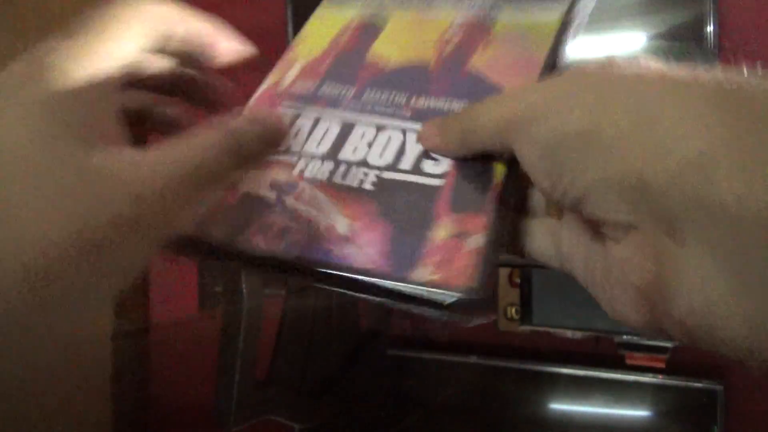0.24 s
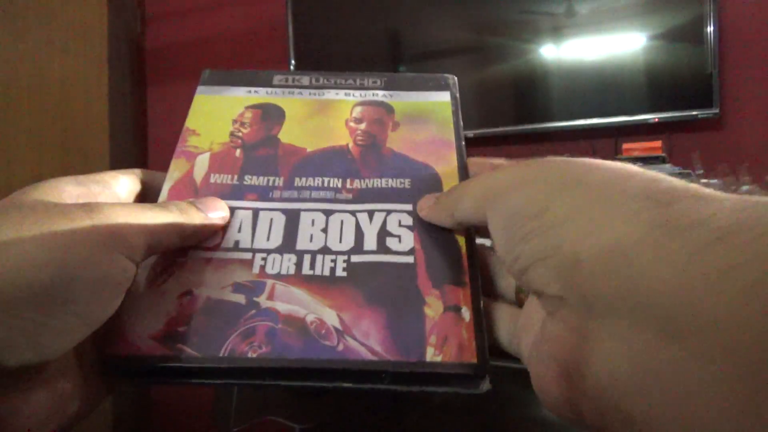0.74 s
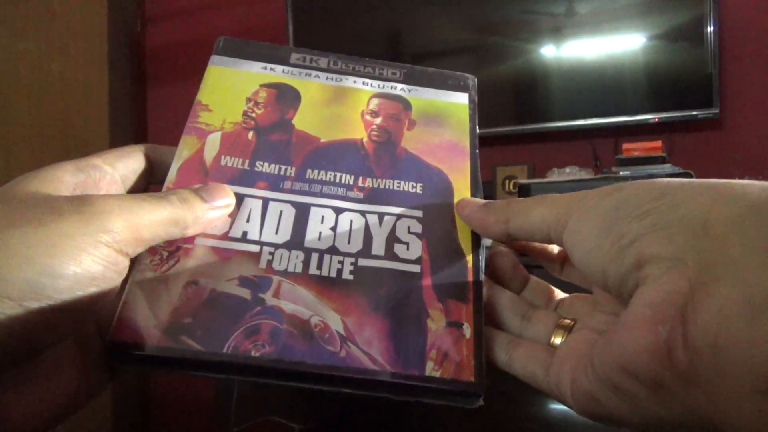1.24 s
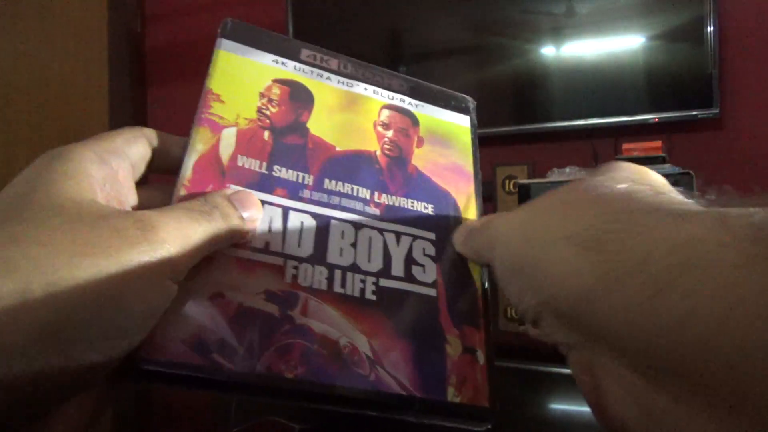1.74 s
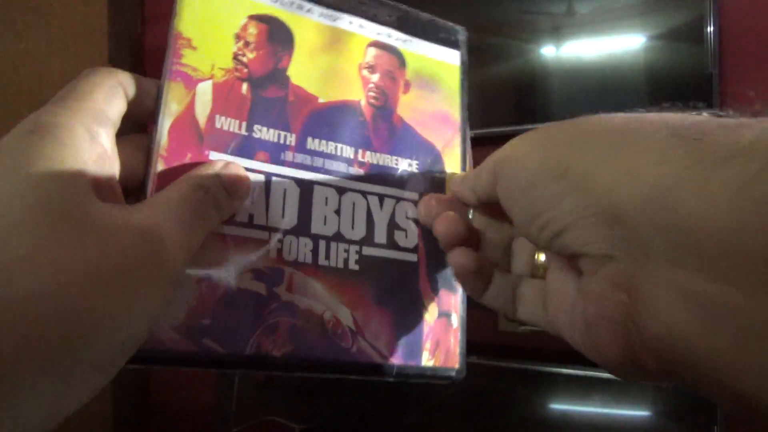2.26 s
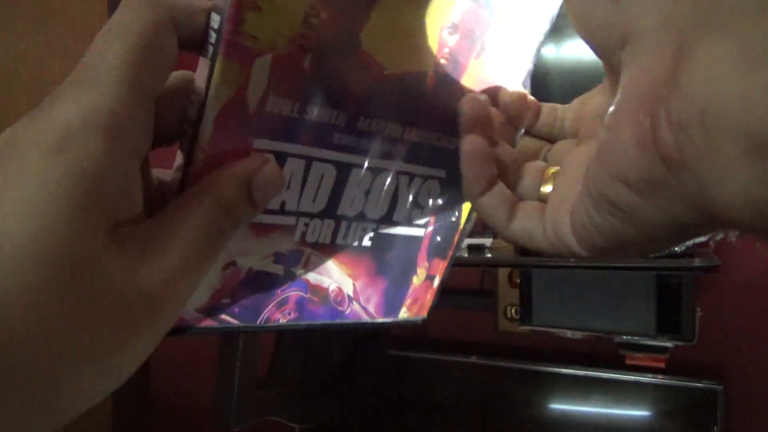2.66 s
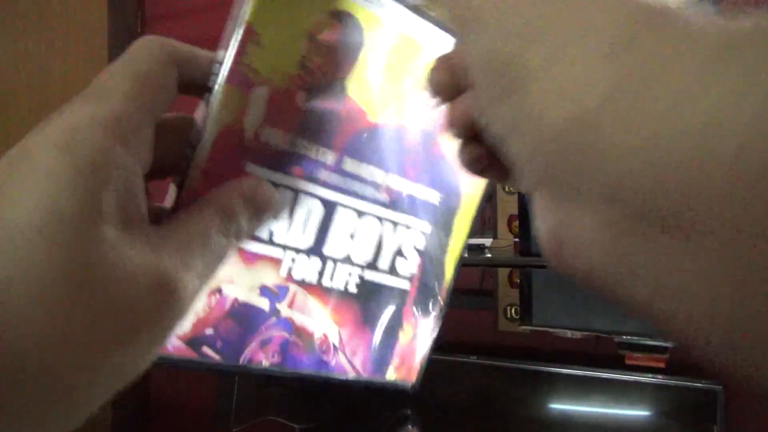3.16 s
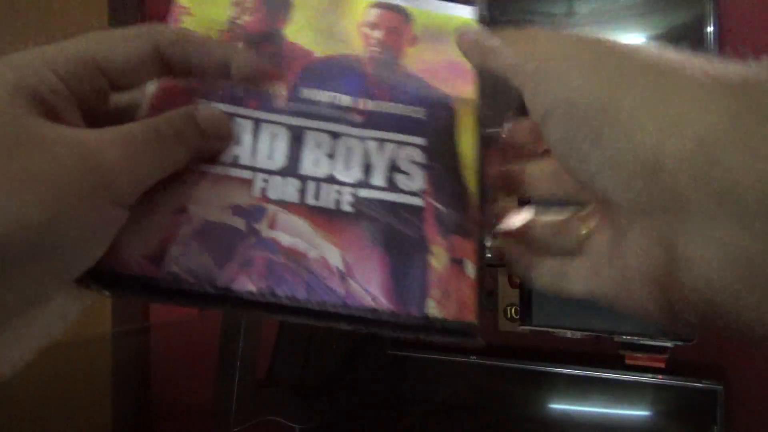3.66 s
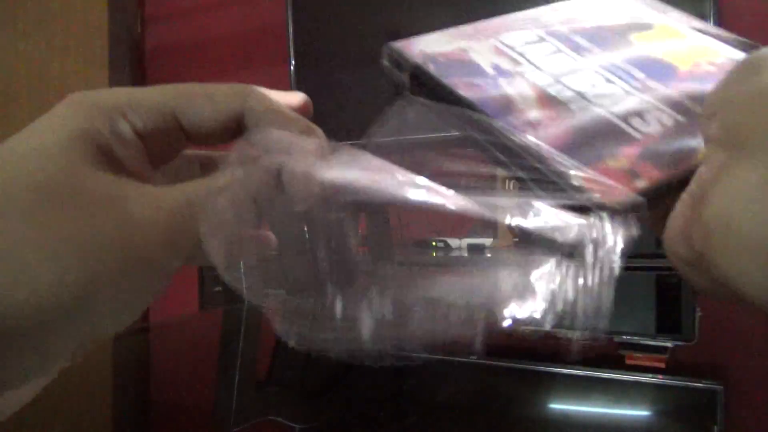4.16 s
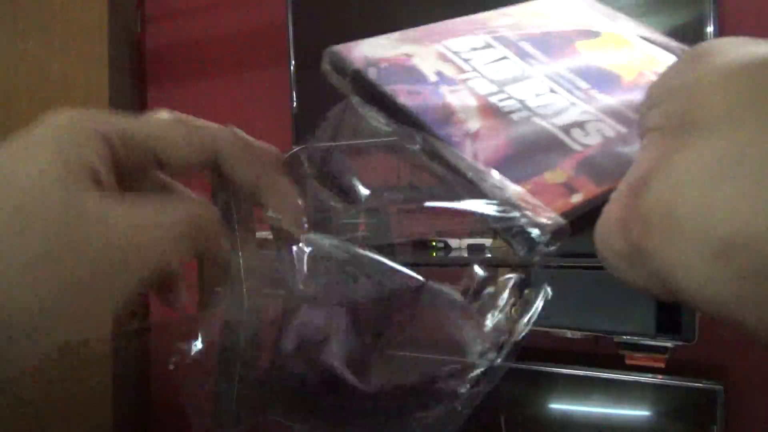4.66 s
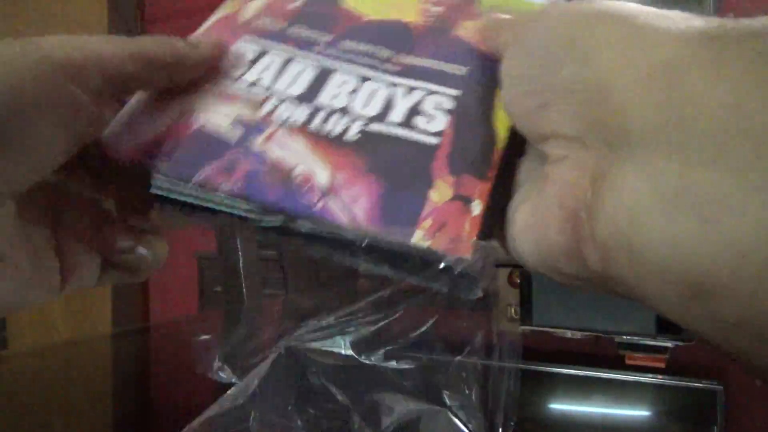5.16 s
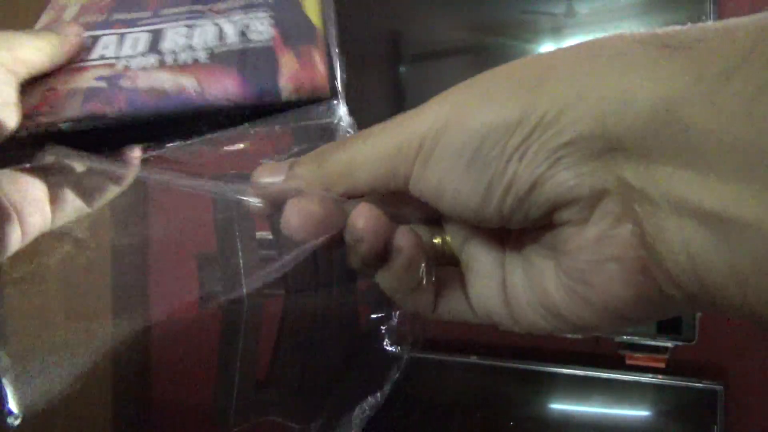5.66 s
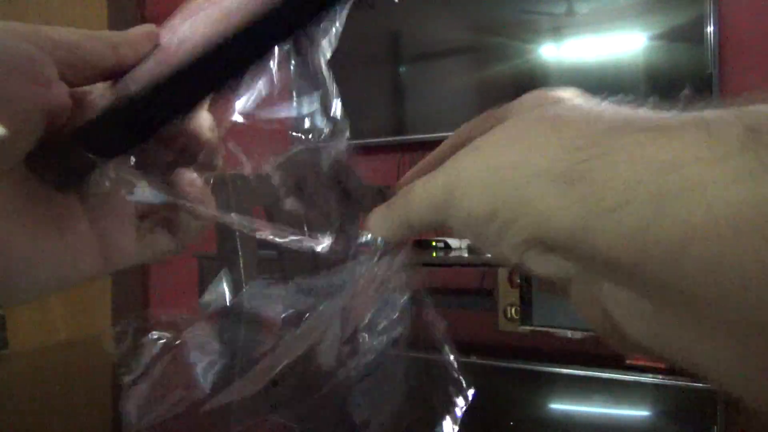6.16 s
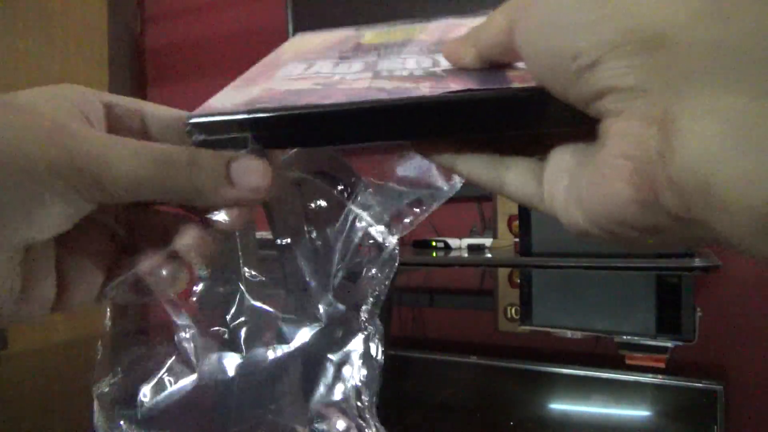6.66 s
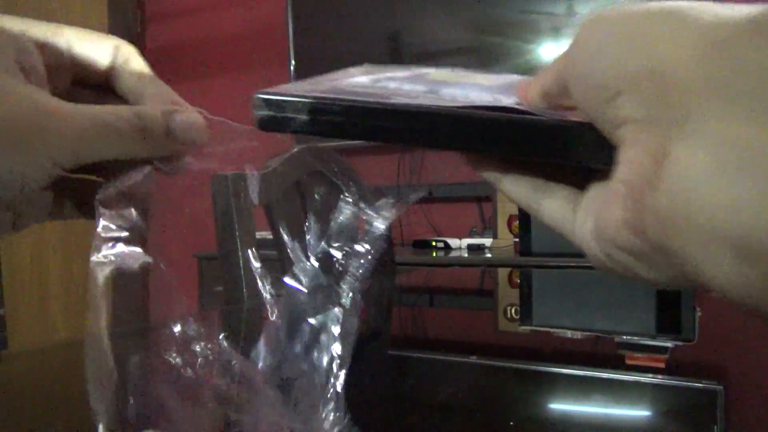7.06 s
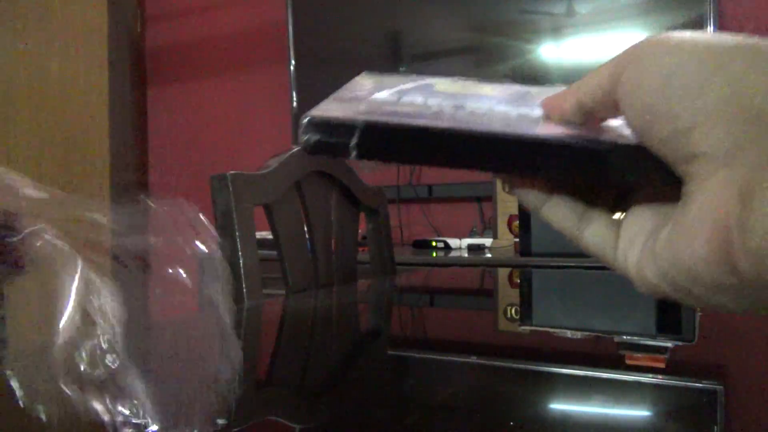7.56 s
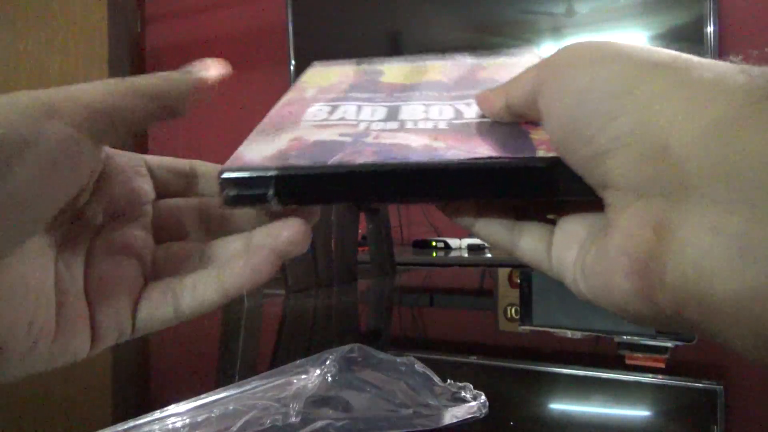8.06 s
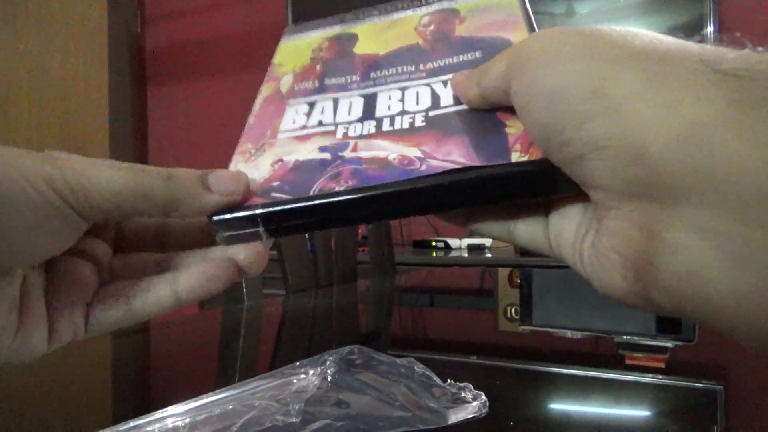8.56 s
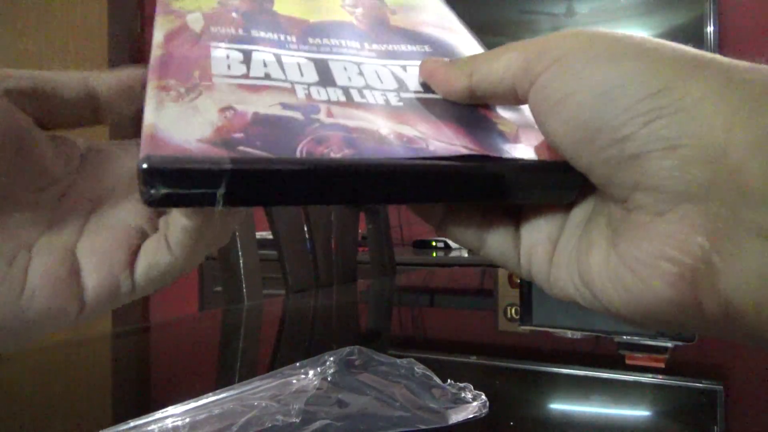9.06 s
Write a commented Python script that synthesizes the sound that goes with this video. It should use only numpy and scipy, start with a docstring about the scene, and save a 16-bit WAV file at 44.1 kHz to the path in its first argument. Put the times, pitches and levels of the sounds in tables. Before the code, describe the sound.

A close stereo microphone in a quiet room with soft noise and a faint high tick about 25 times a second. From 0 to 1 s, fingers rub and lightly knock a hollow plastic case, with small skin swishes. Sharp, bright film snaps begin about 1.1 s and grow more frequent to 2.6. At 2.7 s a rip starts, becoming thick crackle with hollow knocks, strongest from 2.9 to 3.5. A short lull, then loud snaps near 4.15 and 4.4, fading to quiet around 5. Crackling returns at 5.4, with a strong cluster at 5.6-5.8, a snap at 6.15 and softer crinkles afterwards. The loosened sheet rustles lower and broader, with a loud snapping burst at 7.05-7.4. After 7.8 s only sparse snaps and small case taps remain, notably at 8.2, 8.6 and 8.9; a last rustling stroke swells to the end at 9.3.

```python
"""Hands tear thin shrink film off a hollow plastic disc case, close to a small stereo microphone in a quiet room.
Soft noise and a faint regular tick lie underneath. First come rubs, light knocks and swishes of skin, then snaps.
From about 2.7 s the film crackles and snaps densely; after a lull near 5 s a second dense stretch follows.
Past 7.8 s the snaps thin out, and a last stroke swells into the end. Shaped noise makes rustle, snaps and skin;
blows and slips ring the modes of the case, and short sine blips make the tick."""
import sys
import numpy as np
from scipy import signal
from scipy.fft import rfft, irfft, next_fast_len
from scipy.io import wavfile
from scipy.ndimage import uniform_filter1d, map_coordinates

SR = 44100
rng = np.random.default_rng(int(sys.argv[2]) if len(sys.argv) > 2 else 0)


def inscribe(sig):
    """Save sig as 16-bit PCM at rate SR to the path in sys.argv[1].

    A 1-D sig is mono; a 2-D sig holds one channel per row.
    Samples are clipped to [-1, 1] before scaling.
    """
    pcm = np.round(np.clip(np.atleast_2d(sig).T, -1, 1) * 32767)
    wavfile.write(sys.argv[1], SR, pcm.astype(np.int16))


N = 411012
TIME_S = np.arange(N) / SR

# creases that snap; levels and lengths are nominal, trimmed in snaps():
# start_s, level_db, crease_hz, slap_db (relative to level_db), length_ms
SNAPS = [(0.303, -29, 6000, -33, 1.7), (0.316, -25.5, 5960, -21, 2.8), (0.417, -38, 7400, -22, 2.1),
         (1.12, -23, 9900, -25, 1.17), (1.1457, -21.5, 9700, -23, 2.6), (1.1561, -11.5, 9600, -23.5, 2.1),
         (1.362, -38, 7500, -20, 1.7), (1.467, -36, 9500, -16, 1.3), (1.5729, -17, 8800, -20.5, 5.9),
         (1.6018, -17, 9700, -31, 1.27), (1.611, -29, 9600, -17, 2.7), (1.713, -20, 6700, -16.5, 3.5),
         (1.7502, -22.5, 9150, -32, 2.1), (1.8124, -24.5, 9800, -31, 1), (1.8296, -24, 7700, -31, 2.1),
         (1.8405, -10, 9800, -20.5, 3.2), (1.889, -28, 10800, -33, 2.1), (1.9155, -17.5, 9800, -29, 4.2),
         (1.937, -28, 10500, -40, 0.71), (1.985, -34, 9900, -36, 2.5), (2.0774, -23.5, 9200, -12, 2.4),
         (2.0963, -18.5, 9500, -15.5, 2.8), (2.121, -16, 10070, -21.5, 0.71),
         (2.1254, -9.5, 8800, -32, 4.1), (2.2449, -21.5, 9200, -31, 3.5), (2.319, -21.5, 9100, -15, 1.8),
         (2.358, -13, 8500, -12.5, 0.8), (2.366, -27.5, 5300, -11, 2.4), (2.408, -19, 6200, -22, 2.2),
         (2.4453, -10.5, 6850, -33, 1.2), (2.4665, -12, 7640, -56, 3.8), (2.5468, -8, 8700, -20.5, 1.3),
         (2.7247, -8.5, 9100, -30, 1.11), (2.7677, -15, 8300, -18.5, 0.71), (2.776, -11, 9900, -47, 2.3),
         (2.7927, -19, 8750, -46, 0.73), (2.886, -21, 6860, -23, 1.3), (2.893, -18, 8160, -27, 2.8),
         (2.926, -16, 7850, -42, 0.63), (2.94, -14, 4950, -22, 10), (3.0875, -26, 7600, -16, 3.1),
         (3.1022, -32, 4800, -9, 3.5), (3.1261, -25.5, 7800, -8, 8.4), (3.143, -23, 9100, -13, 1.5),
         (3.158, -9.5, 7550, -25, 3.9), (3.184, -19, 5900, -10, 3.1), (3.198, -15.5, 8450, -14, 3.5),
         (3.2037, -30, 7400, -25, 3.6), (3.212, -15, 8750, -12, 1.4), (3.2293, -15, 8500, -14, 3.7),
         (3.246, -14, 6850, -15, 1.9), (3.276, -14.5, 7200, -12, 1.8), (3.283, -16.5, 8800, -8.5, 4.7),
         (3.3088, -15, 7100, -17, 11), (3.319, -20, 7500, -16, 1.3), (3.3304, -8, 6050, -14.5, 1.6),
         (3.3713, -13.5, 8300, -37, 2.4), (3.3774, -16, 9400, -12, 3.3), (3.3855, -18, 7900, -20, 2.7),
         (3.4214, -22, 9350, -30, 2.0), (3.4343, -22, 7000, -27, 4.3), (3.4494, -20.5, 9750, -9, 1.7),
         (3.482, -18, 8250, -28, 1.3), (3.7918, -25, 8300, -32, 1.4), (3.859, -23, 8800, -32, 4),
         (3.8984, -24, 8200, -21, 1.3), (3.959, -27, 7600, -13, 1.9), (3.973, -11.5, 8400, -26, 1.4),
         (4.082, -19, 7200, -29, 2.3), (4.0855, -21, 6800, -42, 4.4), (4.1541, -5.5, 7700, -26, 1.8),
         (4.1623, -8.5, 5600, -20, 2), (4.1715, -16, 6400, -24, 8.8), (4.178, -15, 6900, -34, 2.1),
         (4.3831, -19.5, 8400, -25, 1.9), (4.4241, -10, 4160, -21.5, 0.92), (4.553, -26, 7100, -16, 1.3),
         (4.5907, -34, 9000, -20, 1.5), (4.64, -27, 7900, -9, 0.9), (4.7111, -16.5, 9100, -16, 0.93),
         (4.73, -29, 5470, -20, 2.6), (4.8696, -32, 6700, -11.5, 1.7), (4.987, -34.5, 7900, -20, 1.8),
         (5.033, -31, 5300, -21, 1.2), (5.392, -33, 7240, -13, 9.3), (5.428, -21, 8900, -25, 1.6),
         (5.4317, -24.5, 8900, -11, 3), (5.4764, -25, 9400, -14, 1.4), (5.512, -25, 9900, -21, 4),
         (5.5286, -22, 7660, -17, 1.2), (5.596, -25.5, 8200, -16, 29), (5.63, -15, 5470, -25, 0.96),
         (5.6558, -12, 6800, -22, 6.3), (5.6732, -16.5, 5300, -13, 1.1), (5.6893, -7, 7000, -15.5, 0.86),
         (5.716, -12.5, 8600, -25, 6.1), (5.7255, -6, 8600, -19, 1.7), (5.7349, -7.5, 7200, -25, 0.96),
         (5.7669, -12, 6700, -38, 7.3), (5.8991, -25, 7700, -15, 3.7), (5.9317, -22.5, 9570, -23, 2),
         (5.9437, -30, 7150, -25, 2.9), (6.0047, -27.5, 6660, -16, 1.6), (6.049, -23.5, 8400, -11.5, 2.4),
         (6.0714, -23, 7900, -20, 3.3), (6.08, -28, 9200, -8, 2.1), (6.1262, -23, 9400, -14, 1.3),
         (6.1563, -8, 9500, -17, 4.6), (6.2627, -28.5, 8440, -23, 11), (6.326, -29, 9300, -26, 0.67),
         (6.5329, -24, 6360, -25, 6.6), (6.629, -21, 7600, -20, 9.2), (6.6417, -24, 9300, -25, 3.4),
         (6.6755, -22.5, 7200, -11, 8.1), (6.7284, -22, 6800, -29, 13), (6.745, -26, 7700, -30, 2.2),
         (6.7503, -21.5, 6860, -40, 1.06), (6.7628, -25, 6500, -34, 1.9), (6.8259, -14, 5170, -21, 1.9),
         (6.886, -25, 6700, -20, 3), (7.0202, -28.5, 4970, -23, 1.5), (7.0453, -18.5, 6170, -18, 1.3),
         (7.0525, -14, 6100, -52, 1.3), (7.0565, -8, 6400, -20.5, 3.6), (7.0813, -5, 5300, -25, 1.6),
         (7.121, -26, 6000, -17, 3), (7.136, -20, 5000, -15.5, 1.1), (7.2035, -25, 6300, -33, 1.8),
         (7.238, -33, 6140, -16, 1.8), (7.256, -30, 5800, 1, 0.57), (7.263, -7, 5540, -10, 1.9),
         (7.275, -6, 6470, -21, 0.85), (7.281, -18, 6100, -21, 3.2), (7.2907, -17, 6700, -12, 2.4),
         (7.298, -6, 5350, -24, 2.4), (7.3138, -9.5, 7400, -11, 5.1), (7.3233, -7, 6950, -18.5, 1.3),
         (7.3333, -20, 8600, -5, 5.4), (7.359, -11, 7200, -19, 5), (7.45, -20.5, 6960, -28, 7.9),
         (7.631, -26, 4900, -18, 5), (7.678, -33, 6000, -2.5, 2), (7.7093, -23.5, 8450, -36, 2.1),
         (7.753, -24, 9300, -23, 1.1), (7.7601, -22, 9300, -14, 1.6), (7.8093, -25, 4900, -22, 3.3),
         (7.867, -33, 9500, -30, 2.2), (8.18, -33, 6100, -15, 4.5), (8.229, -35.5, 8900, -33, 2.4),
         (8.4108, -36.5, 8900, -13.5, 2.1), (8.6036, -16, 8600, -27, 0.97), (8.6746, -33, 8750, -23, 3.5),
         (8.965, -27, 8500, -25, 2), (8.9743, -17.5, 7400, -24, 2.1), (9.278, -26, 5500, -26, 5)]
# finger knocks on the case, levels before the trim in case(): start_s, level_db
KNOCKS = [(0.135, -41), (0.2, -56), (0.245, -46), (0.316, -33), (0.45, -47), (0.505, -48), (0.52, -43.5),
          (0.615, -53), (0.743, -48.5), (1.574, -38.5), (1.84, -33), (1.915, -43), (2.096, -42),
          (2.366, -30), (2.445, -41), (2.462, -39), (2.708, -40), (2.784, -32.5), (2.885, -32),
          (2.928, -34), (2.942, -39), (2.953, -21.5), (3.127, -29.5), (3.181, -26), (3.194, -25.5),
          (3.212, -30), (3.275, -26), (3.283, -26.5), (3.312, -18), (3.332, -37), (3.376, -27),
          (3.434, -42), (3.457, -30.5), (3.536, -34.5), (3.788, -33), (4.153, -31), (4.423, -36),
          (4.523, -38.5), (4.715, -55), (5.306, -42), (5.359, -44), (5.375, -46), (5.527, -42.5),
          (5.632, -33), (5.686, -34), (5.712, -21), (5.725, -32), (6.157, -29.5), (6.352, -45),
          (6.402, -47), (6.501, -31.5), (6.884, -42), (7.053, -33), (7.085, -32.5), (7.264, -31),
          (7.792, -57), (8.194, -36), (8.33, -52), (8.83, -41.5), (8.855, -40), (8.886, -40), (8.972, -41),
          (9.05, -42.5)]
# modes of the hollow case: pitch_hz, width_hz, level_db
CASE_MODES = [(284, 250, -10.5), (548.5, 142, 0), (737.5, 125, 2.5), (1097, 330, -1.5), (1505, 1570, -10)]
SWING_DB = 20  # what a swell gains over its rise time and loses over its fall time


def amp(db):
    """Turn dB into gain."""
    return 10 ** (np.asarray(db) / 20)


def unit(x):
    """Scale to rms 1."""
    return x / np.sqrt(np.mean(x ** 2) + 1e-20)


def along(points, hz):
    """Read a curve of (Hz, value) points on a log frequency axis."""
    f, v = np.transpose(points)
    return np.interp(np.log(hz + 1), np.log(f + 1), v)


def over_time(points):
    """Draw straight lines through (s, value) points, one value a sample."""
    return np.interp(TIME_S, *np.transpose(points))


def wobble(rate):
    """A smooth random curve with rate knots a second."""
    knots = rng.standard_normal(int(N * rate / SR) + 4)
    return map_coordinates(knots, [np.arange(N) * rate / SR])


def filtered(x, response):
    """Multiply the spectrum of x by a complex response of frequency."""
    m = next_fast_len(x.shape[-1] + 8192)
    spectrum = rfft(x, m) * response(np.fft.rfftfreq(m, 1 / SR))
    return irfft(spectrum, m)[..., :x.shape[-1]]


def coloured(x, spectrum):
    """Give x a spectral tilt in dB, then scale it to rms 1."""
    return unit(filtered(x, lambda f: amp(along(spectrum, f))))


def resonance(f, hz, width_hz):
    """One causal resonance with gain 1 at its centre."""
    return 1j * f * width_hz / (hz * hz - f * f + 1j * f * width_hz)


def crackle(rate, spread_db, life):
    """Random short noise bursts of unequal size, rms 1; rate is per second, life in seconds."""
    happens = rng.random(N) < rate / SR
    sizes = happens * amp(spread_db * np.minimum(rng.exponential(size=N), 3))
    u = np.arange(SR // 20) / SR / life
    envelope = signal.fftconvolve(sizes, u * np.exp(-u))[:N]
    return unit(envelope * rng.standard_normal(N))


def place(times, rows):
    """Add each row of samples at its time."""
    at = np.round(times * SR).astype(int)[:, None] + np.arange(rows.shape[1])
    return np.bincount(at.ravel(), rows.ravel(), N + SR)[:N]


def peak_one(rows):
    """Scale each row to a peak of 1."""
    return rows / np.abs(rows).max(axis=1, keepdims=True)


def air():
    """Soft room noise whose level drifts, alike in the bass and wide in the middle."""
    # noise spectrum: pitch_hz, level_db (per Hz)
    air_spectrum = [(24, -58), (40, -9), (211, 4), (593, 4.5), (1990, -2), (9720, -15.5), (15300, -33),
                    (16500, -26)]
    # left-right likeness: pitch_hz, likeness (1 is identical)
    air_likeness = [(60, 0.83), (240, 1), (950, 0.15), (3770, 0.21), (15000, 0.82)]

    def split(f):
        """Share the noise between middle and sides by its likeness."""
        turn = np.arccos(np.clip(along(air_likeness, f), -1, 1)) / 2
        return amp(along(air_spectrum, f)) * [np.cos(turn), np.sin(turn)]

    mid, side = filtered(rng.standard_normal((2, N)), split)
    level_db = -59.5 + 0.45 * wobble(2.24)
    return amp(level_db) * unit(np.array([mid + side, mid - side]))


def swells(s, rise, fall, *levels_db):
    """Swells that climb to a peak at s and fade; their powers add. One power curve for each set of levels."""
    t = np.arange(0, N / SR + .002, .002)
    late = t - s[:, None]
    rising, falling = -late / np.reshape(rise, (-1, 1)), late / np.reshape(fall, (-1, 1))
    under_db = SWING_DB * np.maximum(rising, falling)
    curves = [(amp(db[:, None] - under_db) ** 2).sum(0) for db in levels_db]
    return [np.interp(TIME_S, t, curve) for curve in curves]


def handling():
    """Levels of fine, coarse and broad rustle and creak: strokes drive most, snaps shake film, knocks the case."""
    # pulls and rubs of the fingers, before the trims of each layer: peak_s, rise_s, fall_s, coarse_db,
    # fine_db (relative to coarse_db), creak_db (relative to coarse_db)
    strokes = [(.2, 0.28, 0.18, -48, -6, -5.5), (.29, 0.32, 0.049, -46, -22, -1),
               (.5, 0.47, 0.32, -56, -21, 3.5), (.56, 0.088, .1, -54.5, 2, -8),
               (.66, 0.19, 0.12, -62, 13, -13), (.73, .2, 0.039, -63.5, 12.5, -10),
               (.93, 0.36, 0.22, -67, 12, -20), (1.77, 0.15, 0.094, -65, 8, 14.5),
               (2.253, 0.038, 0.052, -46.5, 20, -20), (2.34, 0.26, 0.15, -47, -9, -5),
               (2.49, 0.6, 0.23, -45.5, 5, -4.5), (2.6, 0.066, 0.34, -41, -2, -14),
               (2.764, 0.04, 0.24, -27, 1, -18.5), (2.885, 0.013, 0.011, -24, 3.5, -9),
               (2.949, 0.035, 0.018, -29, 3.5, -16), (3.05, 0.053, 0.4, -47, -1.5, 0.5),
               (3.251, 0.063, 0.052, -31.5, 3, 2.5), (3.43, 0.4, 0.4, -46.5, 0, 1),
               (3.62, 0.55, 0.82, -53.5, -10, -15), (3.812, 0.091, 0.11, -44, 1, 1.5),
               (3.965, 0.076, 0.11, -39.5, -5, -4), (4.166, 0.1, 0.035, -29, -6, -4),
               (4.33, 0.36, 0.31, -53.5, -18, 1), (4.434, 0.27, 0.094, -41.5, -2.5, -8),
               (4.7, 0.094, 0.092, -39, 4, -5), (5.22, 0.022, 0.08, -52.5, -4, 3),
               (5.353, 0.19, 0.076, -51.5, -0.5, -2.5), (5.46, 0.03, 0.31, -46.5, 4, -1.5),
               (5.609, 0.063, 0.045, -34, 1.5, -18), (5.725, 0.2, 0.063, -35, -3, -12),
               (6.11, 0.56, 0.72, -45, -5, -10.5), (6.521, 0.16, 0.27, -46.5, -9, -1),
               (6.685, 0.13, 0.11, -42.5, 5, -7.5), (7.327, 0.047, 0.076, -23.5, -25, -11),
               (7.637, 0.1, 0.11, -46.5, -3, -11), (7.76, 0.03, 0.37, -48, 7, -14),
               (7.801, 0.077, 0.048, -36, 0, -11), (8.171, 0.053, 0.05, -52, 5.5, -15),
               (8.27, 0.19, 0.54, -59, -0.5, -6), (8.77, 0.087, 0.41, -47.5, 1.5, -7),
               (8.852, 0.086, 0.083, -47, -4, -1), (8.984, 0.14, 0.97, -54, 1, 0),
               (9.32, 0.15, .1, -37, -0.5, -20)]
    # the film hangs looser as it comes off: time_s, broad_db (relative to the stroke's coarse rustle)
    slackness = [(0, -23), (3, -12), (4.6, -9), (7.7, -3), (9.32, -8)]
    shiver_db, shiver_rise_s, shiver_fall_s = -38, 0.013, 0.097  # rustle round each snap
    flap_db, flap_fall_s = -15, 0.18  # the slack sheet rustles round each slap
    settle_db, settle_rise_s, settle_fall_s = -10.5, 0.014, 0.083  # creak round each knock
    hold_db = -69  # the case creaks faintly all along, as it is held
    bright_db_per_octave, even_hz = 16, 7400  # high creases shake out finer rustle; equal at even_hz

    s, rise, fall, db, fine_db, creak_db = np.transpose(strokes)
    fine, coarse, creak = swells(s, rise, fall, db + fine_db, db, db + creak_db)
    slack = coarse * amp(over_time(slackness)) ** 2

    s, db, hz, slap_db, _ = np.transpose(SNAPS)
    tilt_db = bright_db_per_octave * np.log2(hz / even_hz) / 2
    flap, = swells(s, shiver_rise_s, flap_fall_s, db + slap_db + flap_db)
    shake_db = db + shiver_db
    fine_shiver, coarse_shiver = swells(s, shiver_rise_s, shiver_fall_s, shake_db + tilt_db, shake_db - tilt_db)

    s, db = np.transpose(KNOCKS)
    settle, = swells(s, settle_rise_s, settle_fall_s, db + settle_db)
    powers = fine + fine_shiver, coarse + coarse_shiver, flap + slack, creak + settle + amp(hold_db) ** 2
    return [10 * np.log10(p + 1e-12) for p in powers]


def patchy(depth_db):
    """Two hisses whose colour drifts in patches as the fingers slide."""
    z = signal.stft(rng.standard_normal((2, N)), nperseg=256)[2]
    field = rng.standard_normal(z.shape)
    field = uniform_filter1d(field, 8, 1)  # smooth over frequency
    field = uniform_filter1d(field, 24, 2)  # smooth over time
    return signal.istft(z * amp(depth_db * unit(field)), nperseg=256)[1][:, :N]


def rustle(fine_db, coarse_db, broad_db):
    """Countless small creases over a sliding hiss: fine ones sound high, wide ones lower; all come in clumps."""
    # spectra of fine creases, wide creases and slack sheet: pitch_hz, level_db (per Hz)
    fine_spectrum = [(600, -57), (4500, -17.5), (8000, -4), (9700, -4), (11000, -11), (12000, -13.5),
                     (15500, -22)]
    coarse_spectrum = [(300, -60), (1500, -28), (2700, -21), (3300, -5), (5500, 0), (7500, -3), (9500, -14),
                       (15000, -24)]
    broad_spectrum = [(250, -35), (900, 0), (1500, -8), (2500, -0.5), (3500, -7.5)]
    # sizes of wide creases, heard as pitches: pitch_hz
    crease_bands_hz = [3400, 4700, 6600]
    # crackliness, low while fingers rub or the film rips evenly: time_s, crackle_db (over the hiss)
    graininess = [(0, 4), (1, -10), (1.2, 10), (2.7, -5), (2.76, 0), (2.871, 4.5), (2.97, 22), (3.75, -1),
                  (4.2, 5), (4.4, 19), (4.68, 6), (4.85, 19), (7.3, 6), (7.42, 2), (7.6, 4.5), (7.8, 5),
                  (7.9, 6), (9.32, 9)]

    clump_db = 1.6 * wobble(60)
    grain = amp(over_time(graininess))
    hiss = patchy(depth_db=2.5)
    fine_crackle = crackle(500, spread_db=4, life=0.00017)
    fine = coloured(hiss[0], fine_spectrum) + grain * coloured(fine_crackle, fine_spectrum)

    wide_crackle = 0
    for hz in crease_bands_hz:
        pops = crackle(250, spread_db=5.5, life=0.0007)
        wide_crackle = wide_crackle + unit(filtered(pops, lambda f: resonance(f, hz, .5 * hz)))
    coarse = coloured(hiss[1], coarse_spectrum) + grain * coloured(wide_crackle, coarse_spectrum)

    sheet = rng.standard_normal(N) + crackle(300, spread_db=4.5, life=0.0017)
    broad = coloured(sheet, broad_spectrum)
    film = amp(fine_db - 5.0) * fine + amp(coarse_db - 3.5) * coarse
    film = film / np.sqrt(1 + grain ** 2)  # more crackle means less hiss
    return amp(clump_db) * (film + amp(broad_db) * broad)


def tick():
    """A faint high tick, 25 times a second, from somewhere in the room: short decaying sine blips."""
    s = np.arange(.03, N / SR - .02, 1 / 25)
    t = np.arange(512) / SR
    blip = np.sin(2 * np.pi * 3490 * t) * t / 0.0051 * np.exp(1 - t / 0.0026)
    scatter_db = rng.normal(0, 2.5, (len(s), 1))
    return place(s, amp(-55.5 + scatter_db) * blip)


def body(f, spot_db):
    """The modes of the hollow case, each raised or lowered by the spot that is touched."""
    thin_hz = 248  # the small case radiates little below this
    modes = 0
    for k, (hz, width_hz, db) in enumerate(CASE_MODES):
        sign = (-1) ** k  # neighbouring modes move in opposite directions
        modes = modes + sign * amp(db + spot_db[k]) * resonance(f, hz, width_hz)
    return 1j * f / (thin_hz + 1j * f) * modes


def case(creak_db):
    """Soft finger blows and slipping film both ring the modes of the case; each blow lands on another spot."""
    s, db = np.transpose(KNOCKS)
    t = np.arange(2048) / SR
    push_ms = 0.26  # a fingertip's press: time from its peak down to 1/e
    push = np.exp(-(t * 1000 / push_ms - 2) ** 2)
    scuff = amp(-60 * t / 0.056) * rng.standard_normal((len(s), len(t)))
    blows = push + 0.21 * scuff
    spot_db = rng.normal(0, 4, (len(s), len(CASE_MODES)))
    ringing = filtered(blows, lambda f: body(f, spot_db.T[..., None]))
    knocks = place(s, amp(db + 3.5)[:, None] * peak_one(ringing))

    slips = crackle(120, spread_db=4.5, life=.0015) + .6 * rng.standard_normal(N)
    creak = filtered(slips, lambda f: body(f, np.zeros(len(CASE_MODES))))
    return knocks + amp(creak_db - 1.0) * unit(creak)


def swishes():
    """Skin slides over the film: noise round one pitch that swells and fades."""
    # short swishes: peak_s, rise_s, fall_s, level_db, pitch_hz
    skin_slides = [(.21, 0.084, .06, -54, 5900), (0.278, 0.067, .04, -49, 6670),
                   (1.44, 0.027, .07, -51.5, 4400), (3.037, 0.015, 0.015, -43, 4200),
                   (3.075, 0.023, 0.022, -42, 3300), (8.432, .01, 0.1, -55, 4200)]
    s, rise, fall, db, hz = (c[:, None] for c in np.transpose(skin_slides))
    late = np.arange(SR // 2) / SR - .25  # the peak sits mid-row
    noise = rng.standard_normal((len(s), len(late)))
    hiss = filtered(noise, lambda f: resonance(f, hz, .45 * hz) ** 2)
    hiss = hiss / hiss.std(axis=1, keepdims=True)
    rows = hiss * amp(db - SWING_DB * np.maximum(-late / rise, late / fall))
    return np.roll(place(s[:, 0], rows), -(SR // 4))  # bring mid-row back to the peak time


def snaps():
    """A crease flips: a short burst round its own pitch, and a duller slap of the sheet."""
    s, db, hz, slap_db, ms = (c[:, None] for c in np.transpose(SNAPS))
    t = np.arange(1024) / SR
    u = t / (0.26 * np.maximum(ms - .6, .2) / 1000)  # long snaps are creases that run along a fold
    attack = u * np.exp(1 - u)
    tail = (1 - np.exp(-u)) * amp(-22.0 - 60 * t / 0.036)
    burst = (attack + tail) * rng.standard_normal((2, len(s), len(t)))

    def crease_tone(f):
        """The pitch of the crease over some plain noise, inside a broad band."""
        return (resonance(f, hz, 0.35 * hz) + amp(-12.5)) * resonance(f, 4930, 8650) ** 2

    crease = peak_one(filtered(burst[0], crease_tone))
    slap = peak_one(filtered(burst[1], lambda f: resonance(f, 1700, 1500) ** 2))
    return place(s[:, 0], amp(db - 1.0) * crease + amp(db + slap_db + 4.5) * slap)


def room(x):
    """Each frequency dies at its own speed; the sides share the bass, and the tail changes as the hands move."""
    # decay of the room: pitch_hz, t60_s
    decay_times = [(200, 0.22), (2000, 0.45), (10000, 0.15)]
    wide_hz = 700  # well below this both sides sound alike
    out, step = np.zeros((2, N + SR)), SR // 4  # a new random tail every quarter second
    for start in range(0, N, step):
        hz, t, z = signal.stft(rng.standard_normal((2, SR // 2)), SR, nperseg=256)
        decay = amp(-60 * t / along(decay_times, hz)[:, None])
        width = np.array([hz ** 0, hz / (hz + wide_hz)])[..., None]
        mid, side = signal.istft(z * decay * width, SR, nperseg=256)[1]
        tail = np.array([mid + amp(0.5) * side, mid - amp(-4.5) * side]) / np.linalg.norm(mid)
        answer = signal.fftconvolve(x[None, start:start + step], tail, axes=1)
        begin = start + 150  # samples before the room answers
        out[:, begin:begin + answer.shape[1]] += answer
    return out[:, :N]


def scene():
    """Film and case close by, panned with the hands, in the room with its tick and noise."""
    # where the hands work: time_s, left_over_right_db
    hand_places = [(0, .2), (1.2, -1.2), (2.6, -.5), (3.3, .5), (4.2, -.2), (5.8, .9), (9.32, .8)]
    fine_db, coarse_db, broad_db, creak_db = handling()
    near = rustle(fine_db, coarse_db, broad_db) + case(creak_db) + swishes() + snaps()
    pan_db = over_time(hand_places)
    direct = near * amp([pan_db / 2, -pan_db / 2])
    ticking = tick() * amp([[1.5], [-1.5]])  # a little to the left
    return direct + amp(-13.5) * room(near) + ticking + air()


def record(dry):
    """The microphone port rings in the treble, the deep bass falls away, and a steep band limit ends the top."""
    # resonance of the microphone port: pitch_hz, width_hz, level_db
    port_mode = (10170, 1330, 3)
    low_hz, top_hz = 92, 16000  # corners of the bass loss and the band limit
    hz, width_hz, db = port_mode

    def microphone(f):
        """Port, bass loss and band limit in one response."""
        port = 1 + amp(db) * resonance(f, hz, width_hz)
        bass_loss = (1j * f / (low_hz + 1j * f)) ** 2
        return 0.74 * port * bass_loss / (1 + (f / top_hz) ** 120)

    return filtered(dry, microphone)


dry = scene()
out = record(dry)
inscribe(out)
```